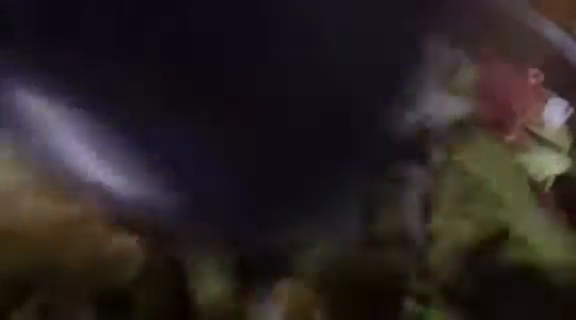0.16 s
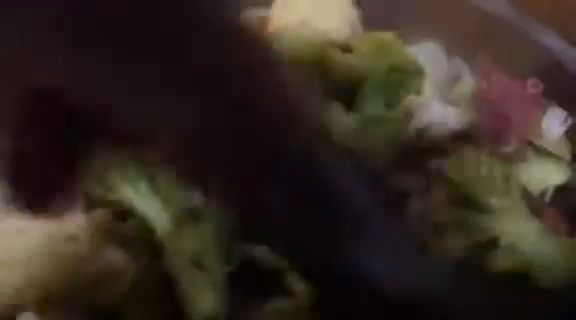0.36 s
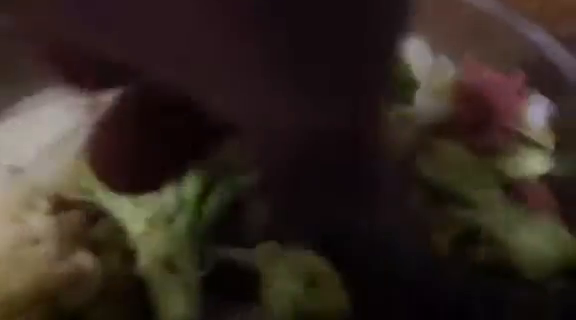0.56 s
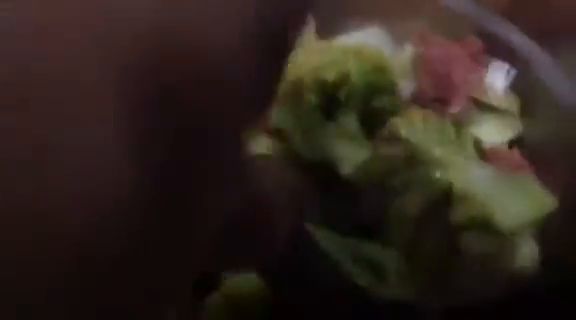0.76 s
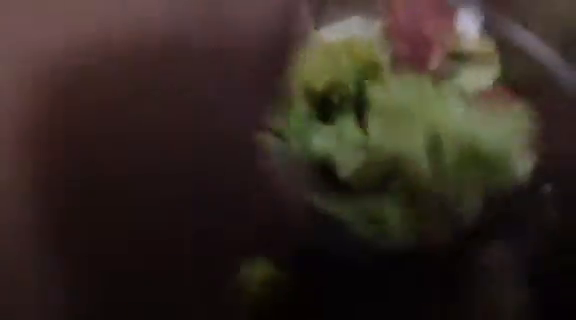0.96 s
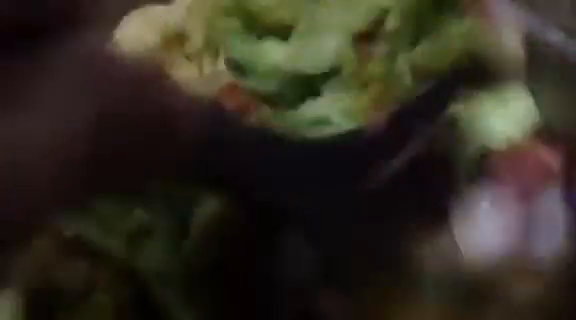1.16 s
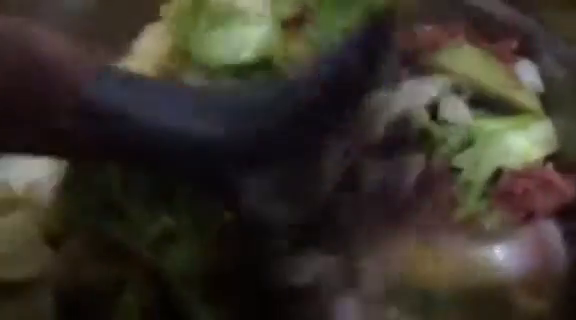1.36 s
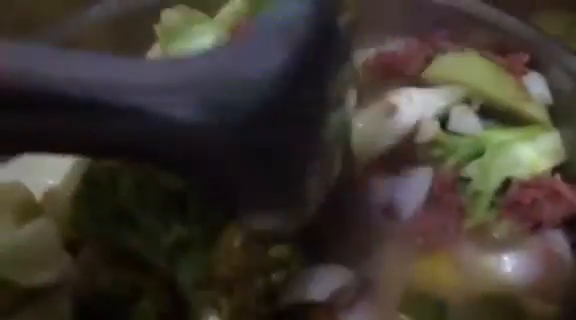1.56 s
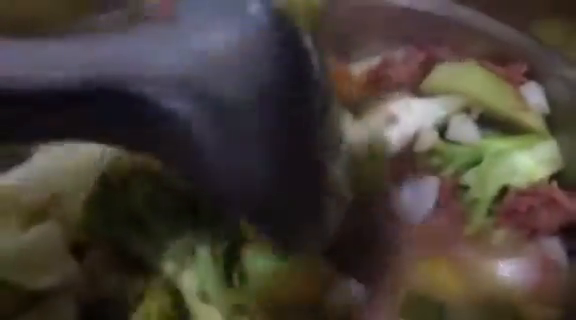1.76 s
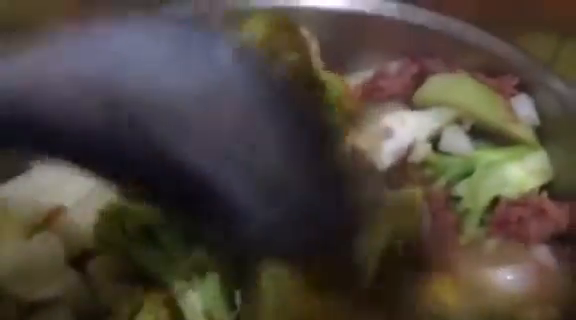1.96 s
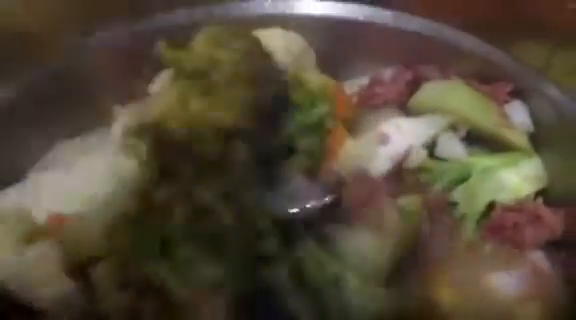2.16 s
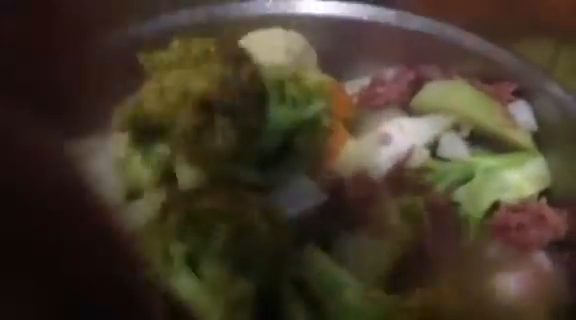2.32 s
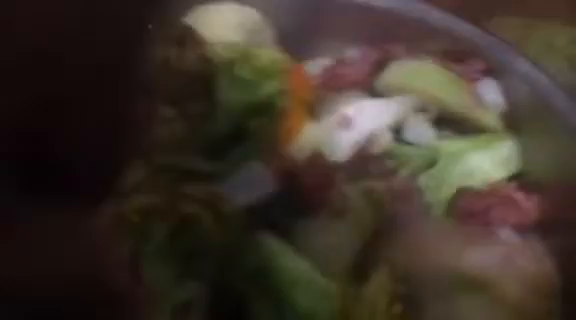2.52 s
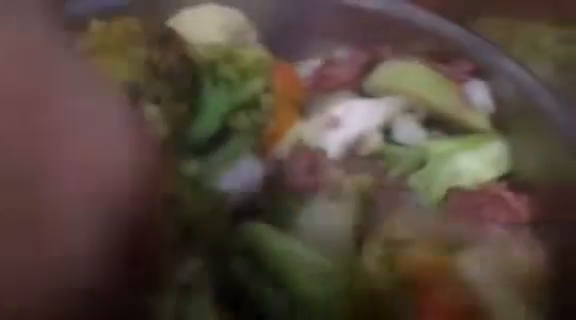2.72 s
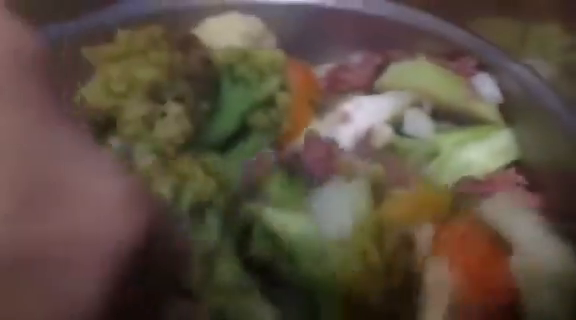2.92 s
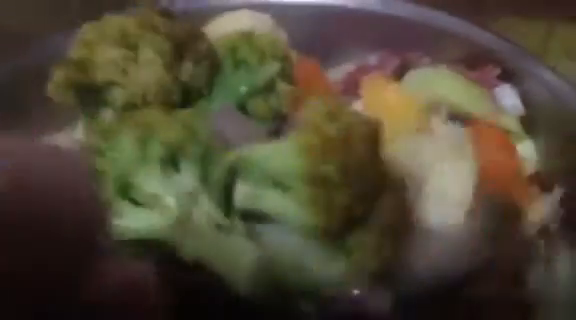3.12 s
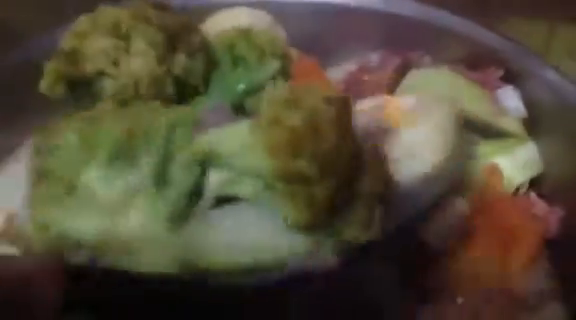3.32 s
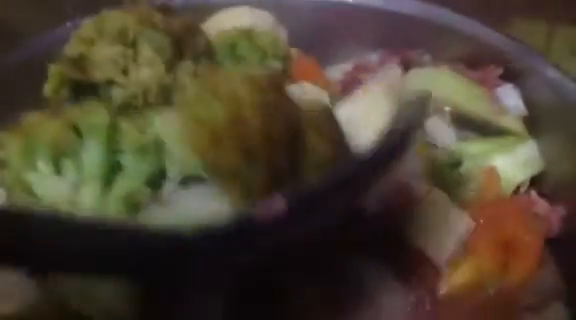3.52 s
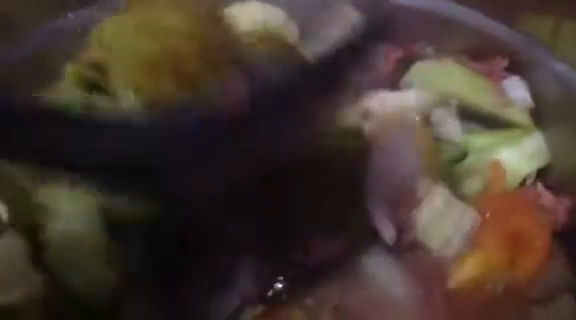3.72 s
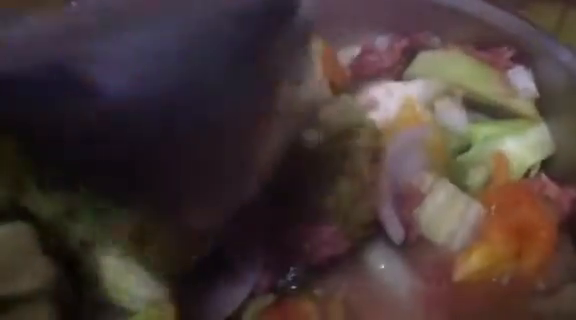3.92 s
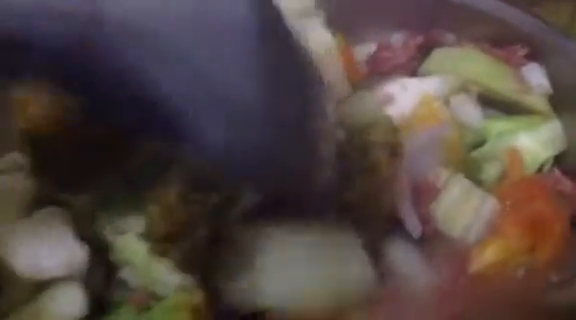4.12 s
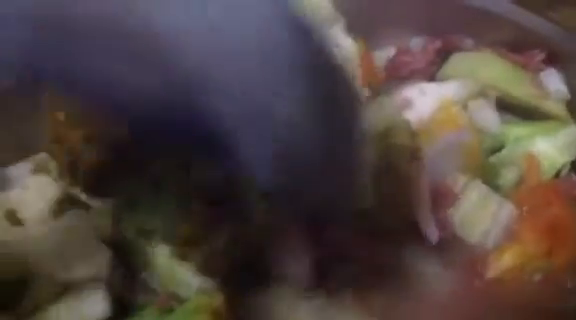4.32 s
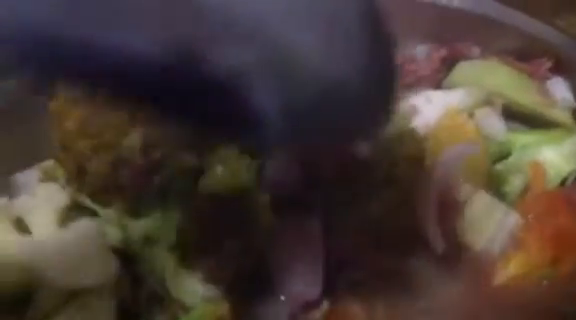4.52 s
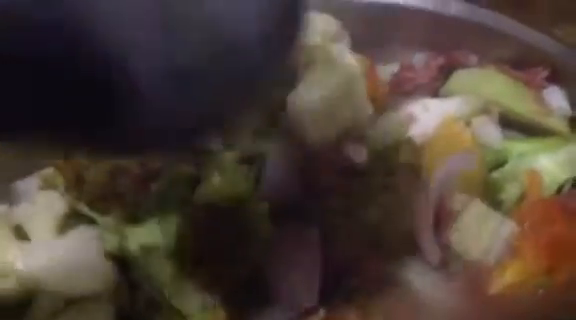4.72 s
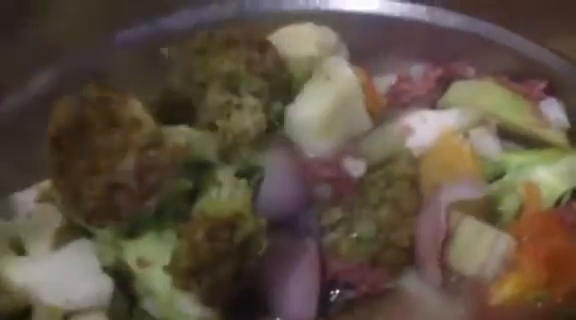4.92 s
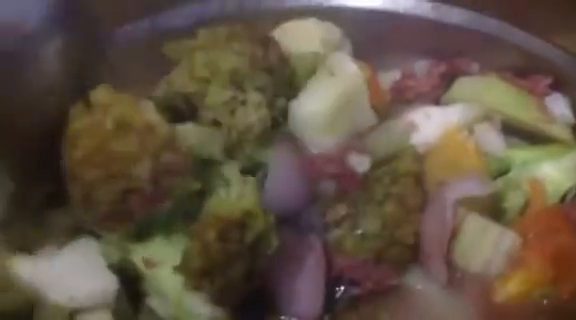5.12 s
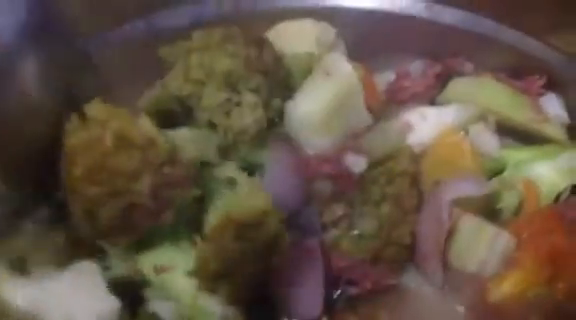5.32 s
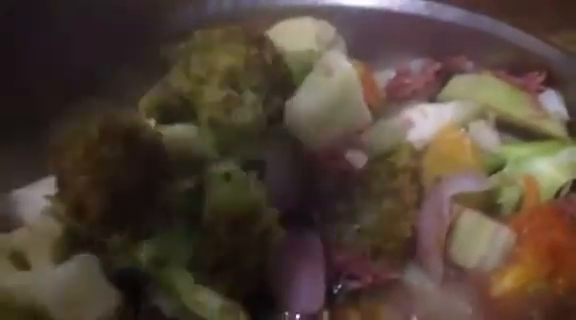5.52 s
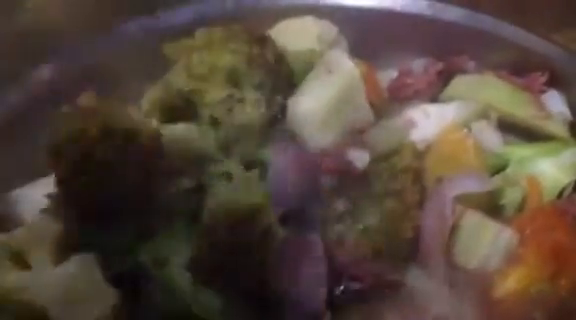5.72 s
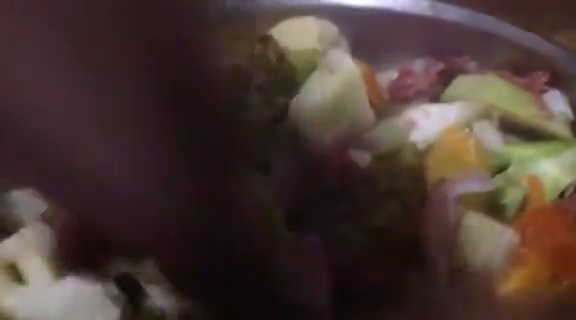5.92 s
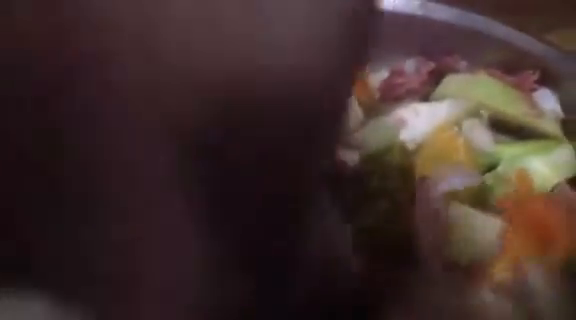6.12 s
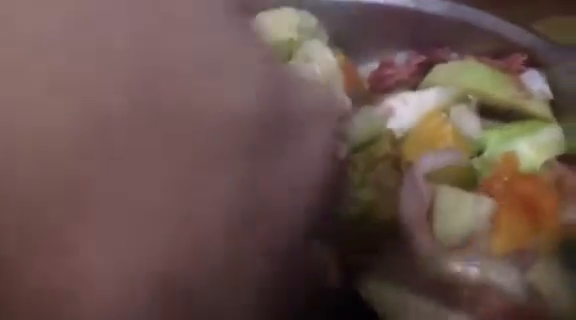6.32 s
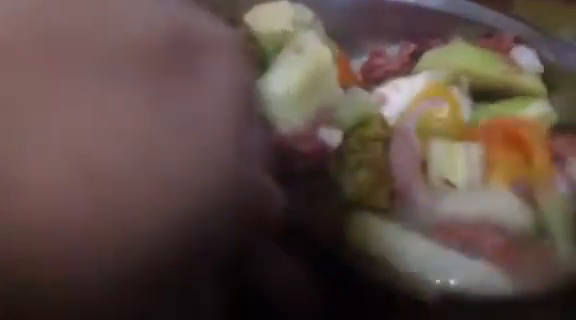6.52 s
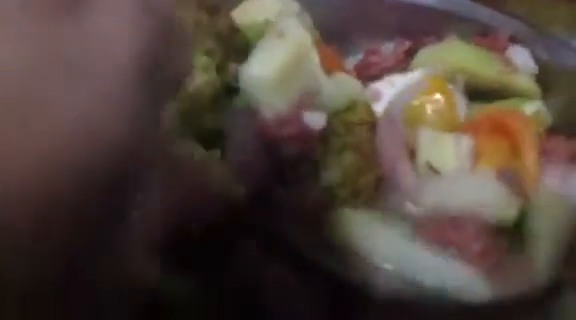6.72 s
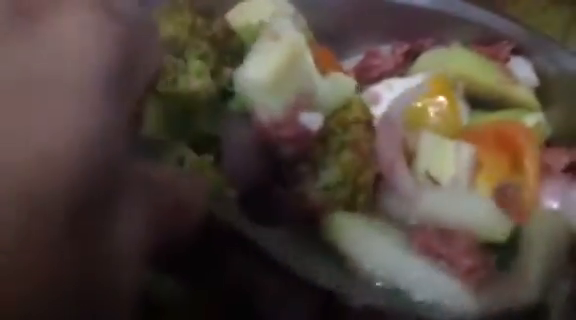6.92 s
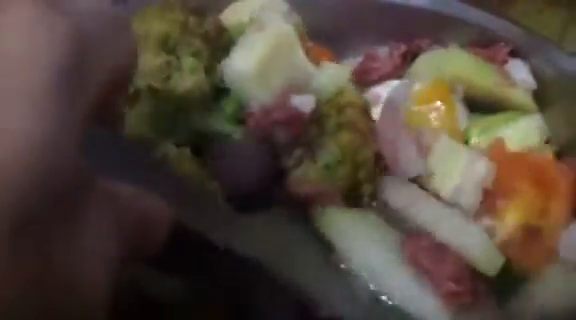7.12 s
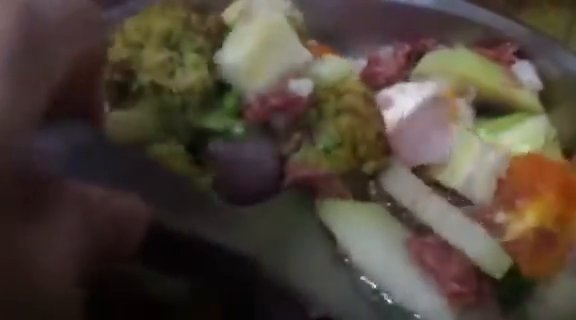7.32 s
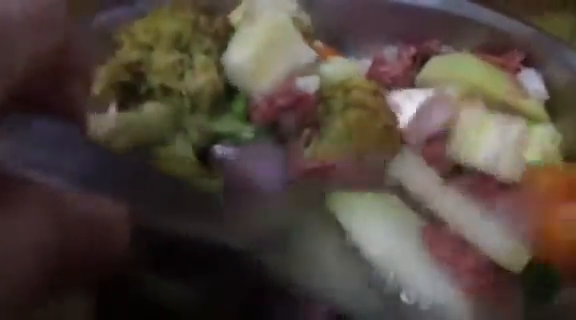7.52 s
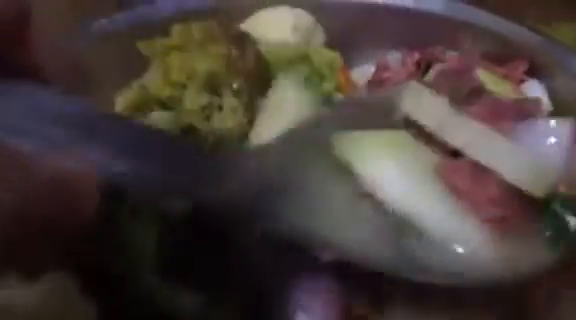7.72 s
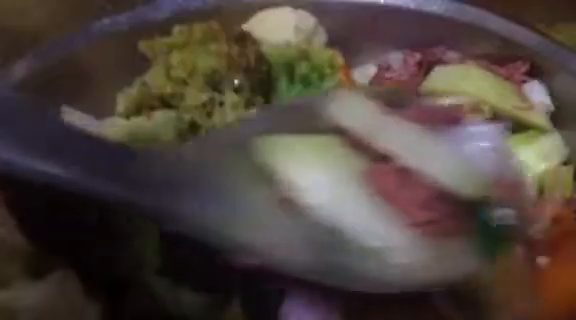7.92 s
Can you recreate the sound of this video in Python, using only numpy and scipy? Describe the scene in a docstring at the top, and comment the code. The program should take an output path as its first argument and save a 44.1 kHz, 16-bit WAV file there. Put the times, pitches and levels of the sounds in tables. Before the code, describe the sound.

Close up in a small kitchen, a spoon stirs juicy vegetables in a metal pan. Faint sizzle and a low steady room rush run throughout. A sharp ringing clink with a dull bump comes early, then wet squelches, soft rubbing and small smacks. A lighter knock follows, then the brightest clink on the rim late on, a strong wet snap, and more stirring with a faint low drag.

```python
"""Stirring wet vegetables in a metal pan

A spoon turns over wet vegetables in a metal pan, close by, in a small kitchen with a low steady rush.
Filtered noise and showers of short resonances make the simmer, squelch and rubbing; brief snaps make
the smacks, ticks and knocks. Cracks, dense clang and decaying modes make the spoon's clinks; gliding
sines make dull bumps, and noise through one resonance makes the drone of the dragging spoon."""
import sys
import numpy as np
from scipy import signal
from scipy.fft import rfft, irfft, next_fast_len
from scipy.io import wavfile

SR = 44100
rng = np.random.default_rng(int(sys.argv[2]) if len(sys.argv) > 2 else 0)


def wav_out(sig):
    """Save sig, one row per channel (or a flat mono array), as 16-bit PCM at SR to the path in sys.argv[1]."""
    wavfile.write(sys.argv[1], SR, np.round(np.clip(np.atleast_2d(sig).T, -1, 1) * 32767).astype(np.int16))


N = 355446
TIME = np.arange(N) / SR  # s
EDGE_HZ = 8020  # upper edge of the whole sound


def amp(db):
    """Decibel law: 20 dB is a factor of ten in amplitude."""
    return 10 ** (np.asarray(db) / 20)


def unit(x):
    """Normalisation: scales x to rms 1."""
    return x / np.sqrt(np.mean(x ** 2) + 1e-20)


def add(mix, s, sound):
    """Superposition: adds a sound to the mix from time s on."""
    part = mix[round(s * SR):][:len(sound)]
    part += sound[:len(part)]


def wander(t, per_s):
    """Random modulation: a smooth drift of rms about 1, read at the positions t."""
    steps = rng.standard_normal(1000) * np.sqrt(3 / 2)  # makes up for the smoothing between steps
    return np.interp(t * per_s + rng.random(), np.arange(len(steps)), steps)


def colour(x, points):
    """Spectral shaping: weights x by a curve of (f/Hz, level/dB) points, at rms 1."""
    hz, db = np.transpose(points)
    size = next_fast_len(len(x), True)
    f = np.fft.rfftfreq(size, 1 / SR)
    curve_db = np.interp(np.log(f + 1), np.log(hz), db)
    gain = amp(curve_db) * (f < EDGE_HZ + 400)
    return unit(irfft(rfft(x, size) * gain, size)[:len(x)])


def dense(count):
    """Random-phase superposition: equal partials at every frequency add up to noise."""
    return irfft(np.exp(2j * np.pi * rng.random(count // 2 + 1)), count)


def snap(t, hz, octaves):
    """Time-bandwidth reciprocity: the shorter this click, the wider its spectrum; its envelope peaks at 1."""
    u = t * hz * octaves * 2
    return u * np.exp(1 - u) * np.sin(2 * np.pi * hz * t)


def grains(count, spread_db, cycles, clump_db, channels=14):
    """Impulse excitation of resonators: tiny bursts of many pitches arrive in clumps."""
    out, shared = np.zeros(N), wander(TIME, per_s=51)
    for hz in np.geomspace(700, 7600, num=channels):
        at = np.sort(rng.integers(0, N, count // channels))
        # with a spread, most bursts are small and a few large
        size_db = spread_db * np.minimum(rng.exponential(1, len(at)), 4.5)
        clumps = wander(at / SR, per_s=28) + .5 * shared[at]
        strength = unit(amp(size_db + clump_db * clumps))
        kicks = np.bincount(at, strength * rng.choice([-1, 1], len(at)), N)
        r = np.exp(-hz / cycles / SR)  # each burst rings for a few cycles
        poles = [1, -2 * r * np.cos(2 * np.pi * hz / SR), r * r]
        out += hz * signal.lfilter([1, 0, -1], poles, kicks + 1e-12)
    return out


def kitchen(x, wet_db, t60):
    """Reverberation: close hard walls add a short tail of scattered, decaying echoes."""
    t = TIME[:SR // 2]
    scattered = rng.standard_normal(len(t)) * (rng.random(len(t)) < 3000 / SR)
    taps = scattered * amp(-60 * t / t60) * (t > .002)
    return x + amp(wet_db) * signal.oaconvolve(x, taps / np.linalg.norm(taps))[:N]


# spectrum of the room's rush: f/Hz, relative level/dB per Hz
RUSH_SPECTRUM = [(20, -53.5), (45, -31), (75, -6), (100, -12.5), (130, 2.5), (175, -1), (225, 0), (290, 4),
                 (390, -13.5), (560, -3), (850, -9.5), (1500, -12.5), (4000, -41)]


def rush(level_db=-56):
    """Stationary noise: the low steady rush of the stove and the room."""
    return amp(level_db) * colour(rng.standard_normal(N), RUSH_SPECTRUM)


# pushes of the spoon through the food: start t/s, length/s, wet crackle level/dB, dull rubbing level/dB
PUSHES = [(0, 0.84, -82, -56.5), (0.675, 0.46, -63, -57), (1.14, 0.26, -73, -58), (2.479, 0.11, -62, -50.5),
          (2.68, 0.38, -74, -60), (3.204, 0.51, -55.5, -63), (3.667, 0.21, -60, -60),
          (3.888, 0.81, -61, -64), (4.499, 0.65, -58, -60.5), (4.88, 0.8, -80, -58),
          (6.025, 0.086, -50, -77), (6.56, 1, -73, -58.5), (7.31, 0.41, -64.5, -59.5),
          (7.643, 0.69, -65, -59)]


def stirring(skew=0.5, fullness=0.58):
    """Shared excitation: each push (0-1) sets the gains of both wet crackle and dull rubbing."""
    push, wet, dull = np.zeros((3, N))
    for s, length, wet_db, dull_db in PUSHES:
        u = np.clip((TIME - s) / length, 0, 1)
        # a push swells quickly and eases off slowly
        arch = abs(np.sin(np.pi * u ** skew)) ** fullness
        push = np.maximum(push, arch)
        # powers add where pushes overlap
        wet = np.hypot(wet, amp(wet_db) * arch)
        dull = np.hypot(dull, amp(dull_db) * arch)
    return push, wet, dull


# sizzle of the hot pan, rising and falling: t/s, level/dB
SIZZLE_LEVEL = [(0, -62.5), (.65, -59.5), (1.12, -62.5), (1.35, -57.5), (2.2, -59.5), (2.65, -56),
                (3.1, -58), (4.3, -59.5), (5.6, -57.5), (6.27, -58.5), (6.38, -65), (7.0, -62), (7.27, -68),
                (7.4, -60), (7.62, -63), (7.76, -56.5), (8.06, -59)]


def simmering():
    """Amplitude envelope: the gain of the simmering juices, interpolated in dB."""
    s, level_db = np.transpose(SIZZLE_LEVEL)
    return amp(np.interp(TIME, s, level_db))


# spectrum of the wet crackle: f/Hz, relative level/dB per Hz
SQUELCH_SPECTRUM = [(900, -47.5), (1600, 4.5), (2300, 5.5), (2850, 10), (3600, 4), (4800, 0), (7400, -6.5),
                    (8000, -29)]


def squelch(wet, heat, simmer_db=0.0):
    """Granular noise: wet pieces crackle under the spoon in many brief bursts."""
    crackle = np.hypot(wet, amp(simmer_db) * heat)  # the juices simmer on between pushes
    bursts = grains(count=22000, spread_db=0.0, cycles=2.2, clump_db=2.5)
    return crackle * colour(bursts, SQUELCH_SPECTRUM)


# spectrum of the sizzle: f/Hz, relative level/dB per Hz
SIZZLE_SPECTRUM = [(800, -8.5), (2000, -5.5), (4200, 4), (5500, 2.5), (6700, 3.5), (7450, 2), (7950, -17)]


def sizzle(heat, spit_db=-9, flare_db=0.5):
    """Shot noise: tiny bubbles burst and spit at random on the hot metal."""
    bubbles = unit(grains(count=150000, spread_db=2.0, cycles=1.3, clump_db=3.5))
    spits = unit(rng.standard_normal(N) * (rng.random(N) < 50 / SR))  # about 50 per s
    flare = amp(flare_db * wander(TIME, per_s=14))  # juice reaches the hot metal unevenly
    return heat * flare * colour(bubbles + amp(spit_db) * spits, SIZZLE_SPECTRUM)


# spectrum of the rubbing: f/Hz, relative level/dB per Hz
RUB_SPECTRUM = [(200, -11.5), (330, 6), (600, 6.5), (900, -2), (1200, 3.5), (1500, -7), (2500, -3.5),
                (8000, -28)]


def rub(dull, rest_db=-61, clump_db=2.5):
    """Friction noise: pieces rub under the spoon with an unsteady dull rustle."""
    rubbing = np.hypot(dull, amp(rest_db))
    unsteady = amp(clump_db * wander(TIME, per_s=60))
    return rubbing * unsteady * colour(rng.standard_normal(N), RUB_SPECTRUM)


def smack(db, hz, octaves, t60, spatter_db, spatter_rise=0.0007):
    """Impulsive excitation: a snap of a few cycles, with a short noisy spatter decaying after it."""
    t = TIME[:SR // 7]
    f = np.geomspace(100, 9000, num=30)
    band_db = -10 * np.log10(1 + (np.log2(f / hz) / octaves) ** 4)
    fade = amp(-60 * t / t60) * np.minimum(t / spatter_rise, 1)
    spatter = colour(dense(len(t)), np.column_stack([f, band_db])) * fade
    return amp(db) * (snap(t, hz, octaves) + amp(spatter_db) * spatter)


# small smacks, by chance during pushes
SMALL_PER_S = 21  # at full push
SMALL_OVER_DB, SMALL_SCATTER_DB = 13.5, 2.5  # mean snap level over the wet crackle gain, and its scatter
SMALL_HZ, SMALL_SCATTER_OCTAVES = 2520, 0.48  # middle pitch and its scatter
SMALL_OCTAVES, SMALL_T60, SMALL_SPATTER_DB = 0.37, 0.015, -21  # spread, spatter decay in s and level
# the loudest short smacks, ticks, knocks and scrapes: t/s, snap peak level/dB, centre f/Hz,
# spread/octaves, spatter t60/s, spatter level/dB against the snap
LOUD_SMACKS = [(0.091, -43, 3150, 0.17, 0.05, 2.5), (0.5624, -35, 1690, 0.13, .04, -19),
               (0.6235, -41.5, 1090, 1.2, 0.034, -3), (0.721, -41.5, 2420, 0.44, .02, -18),
               (0.772, -42, 4670, 0.5, .02, -4), (0.831, -44.5, 2750, 0.48, 0.067, -1.5),
               (1.169, -44.5, 2340, 0.24, .03, -4), (1.177, -40, 900, 0.37, 0.11, -4.5),
               (1.281, -35, 2900, 1.1, .015, -24), (1.3095, -35, 3800, .8, .012, -16),
               (1.3408, -32.5, 3870, 0.97, 0.018, -7), (1.354, -44.5, 1090, 0.42, 0.083, -4.5),
               (1.373, -42.5, 2900, 0.16, .02, -16), (1.4658, -37.5, 3480, 0.31, 0.036, -7),
               (1.4825, -46, 3390, .21, .02, -22), (1.5555, -34.5, 4150, 0.55, 0.022, -10),
               (1.7836, -40, 2730, .55, 0.064, -7), (1.8026, -43.5, 2700, 0.97, 0.063, -2),
               (2.3782, -35, 1700, 0.73, 0.04, -7), (2.394, -44, 1890, .35, .03, -11),
               (2.402, -46, 3370, 0.27, .02, -17), (2.4624, -42, 2730, 0.22, 0.082, -4),
               (2.505, -46, 4000, 0.5, .2, -4), (2.521, -46.5, 4000, 0.48, 0.1, -1.5),
               (2.7396, -39, 2840, 0.75, 0.022, -6), (3.0125, -45, 1900, 1.4, .02, -4),
               (3.036, -43.5, 1240, 0.44, 0.095, -6.5), (3.163, -43, 5000, 1.1, 0.018, -1),
               (3.1701, -32, 2320, 1.3, 0.045, -8.5), (3.192, -32, 2170, 0.6, 0.048, -13),
               (3.2263, -39.5, 4160, 0.79, 0.022, -5), (3.2817, -40, 2800, 0.23, .02, -16),
               (3.306, -42, 2960, .3, .015, -18), (3.322, -39, 3120, 0.5, 0.05, -7),
               (3.355, -44, 2870, .57, .015, -20), (3.3931, -38, 2800, 0.59, .015, -18),
               (3.413, -42, 2330, 0.45, 0.087, -6), (3.4863, -37.5, 2510, 0.32, .02, -21),
               (3.5685, -36, 2300, 0.55, .014, -8), (3.667, -39, 3370, 0.3, .02, -20),
               (3.7326, -43, 2860, 0.23, .015, -18), (3.749, -42.5, 1800, 0.94, .03, -1.5),
               (4.026, -37, 3560, .6, .015, -18), (4.5247, -34, 2740, 0.42, .015, -18),
               (4.5334, -41, 3200, 0.22, .015, -20), (4.5681, -44, 2880, 0.49, .015, -18),
               (4.577, -37.5, 1790, 1.0, .02, -6), (4.6095, -39, 3250, .4, .015, -20),
               (4.695, -40, 2900, 0.34, .02, -18), (4.704, -42, 2770, 0.25, .02, -18),
               (4.8166, -40, 2900, 0.38, .015, -16), (4.839, -32, 2740, 0.32, 0.054, -16),
               (4.9024, -42, 2670, .3, .015, -18), (4.925, -37, 4130, 0.62, .02, -7),
               (4.975, -38, 3120, 0.71, 0.022, -6), (5.3474, -40, 3080, 0.79, .015, -14),
               (5.451, -42, 2820, 0.35, .015, -18), (5.7299, -45, 3920, 0.61, .015, -18),
               (6.0476, -23.5, 2520, 0.4, 0.022, -4.5), (6.061, -38, 3580, .35, 0.091, -11),
               (6.232, -40.5, 2490, 0.25, 0.18, -11), (6.256, -42.5, 2980, 1, 0.051, -4),
               (6.32, -41, 5800, 0.28, .03, -10), (6.9379, -45, 1670, 0.77, .03, -8),
               (6.978, -36.5, 2600, 0.47, .02, -19), (7.1498, -37, 5700, 1.2, .012, -5.5),
               (7.163, -34.5, 2670, 0.95, 0.021, -7.5), (7.344, -41, 2400, 0.31, .03, -11),
               (7.4044, -43, 2900, 0.26, .015, -16), (7.465, -41, 2660, 0.32, 0.047, -7),
               (7.551, -36, 3100, 0.32, .02, -3), (7.56, -31, 2600, 0.51, 0.013, -19),
               (7.6566, -38, 2600, 0.52, .02, -18), (7.6877, -44, 4130, 0.63, .02, -4),
               (7.740, -38, 3700, 0.72, 0.022, -10), (7.8003, -38, 3200, 0.56, .02, -15)]


def smacks(push, wet, count=300):
    """Random point process: small smacks join the loud ones, thicker and stronger with the push."""
    out = np.zeros(N)
    for s, *sound in LOUD_SMACKS:
        add(out, s, smack(*sound))
    for at in rng.integers(0, N, count):
        if rng.random() < push[at] * SMALL_PER_S * TIME[-1] / count:
            size, pitch = rng.standard_normal(2)
            db = SMALL_OVER_DB + SMALL_SCATTER_DB * size
            hz = SMALL_HZ * 2 ** (SMALL_SCATTER_OCTAVES * pitch)
            small = smack(db, hz, SMALL_OCTAVES, SMALL_T60, SMALL_SPATTER_DB)
            add(out, TIME[at], wet[at] * small)
    return kitchen(out, wet_db=-6, t60=0.11)


# bands where the pan has hardly any modes: f/Hz, half width/Hz
MODE_GAPS = [(1540, 50), (2250, 85), (3025, 45)]


def mode_clusters(f, gap_db=-16):
    """Modal density: each blow wakes some clusters of modes and misses others."""
    gaps = amp(gap_db * sum(np.exp(-((f - hz) / width) ** 4) for hz, width in MODE_GAPS))
    return gaps * amp(2.5 * wander(f, per_s=1 / 70))  # here the drift runs along frequency


def crack(t, f, spectrum, clusters, ring, chatter_db, t60=0.059, tilt_db=3.0, level_db=-2, chatter_s=0.012):
    """Impact noise: a quickly damped crack, strongest while the spoon's edge chatters on the metal."""
    brighter = [(hz, level + tilt_db * np.log2(hz)) for hz, level in spectrum]
    chatter = chatter_db * np.exp(-(t / chatter_s) ** 4)
    fade = amp(level_db - 60 * t / (t60 * ring) + chatter)
    noise = colour(irfft(rfft(dense(len(t))) * clusters), brighter) * fade
    return noise * np.linalg.norm(fade) / np.linalg.norm(noise)


def clang(t, f, spectrum, clusters, ring, level_db=-14, t60=0.25):
    """Diffuse modal field: a crowd of weak separate partials, about one in every 30 Hz, dies away."""
    crowd = np.diff(np.floor(f / 30 + .6 * wander(f, per_s=1 / 30)), prepend=0) > 0
    partials = irfft(crowd * clusters * np.exp(2j * np.pi * rng.random(len(f))))
    return colour(partials, spectrum) * amp(level_db - 60 * t / (t60 * ring))


# the pan's clear modes: f/Hz, t60/s at ring factor 1, relative level/dB struck on rim, on wall, on floor
PAN_MODES = [(147, .25, -24, -14, -14), (203, .28, -17, -8, -8), (330, .2, -24, -10, -14),
             (384, .18, -22, -7, -4), (457, .22, -24, -16, -7), (502, .22, -25, -18, -4),
             (571, .33, -19, -26, -14), (606, .22, -22, -18, -6), (671, .14, -16, -9, -12),
             (1044, .16, -14, -9, -10), (1114, .16, -13, -2, -2), (1157, .7, -28, -26, -13),
             (1283, .3, -15, -22, -10), (1916, .2, -7, -18, -20), (1937, .21, -6, -7, -18),
             (2402, .2, -12, -16, -10), (2460, .2, -9, -16, -16), (2580, .19, -13, -16, -18),
             (2750, .21, -9, -15, -16), (2943, .16, -22, -14, -8), (1190, .9, -31, -25, -13),
             (1236, .3, -8, -22, -15), (1694, .19, -4, -18, -14), (1782, .2, 1, -24, -18),
             (1850, .22, -4, -20, -22), (1962, .24, -1, -5, -15), (2004, .25, -3, -13, -24),
             (2054, .2, -13, -10, -18), (2347, .2, -13, -35, -24), (2531, .22, -2, -25, -14),
             (2628, .2, -8, -9, -20), (2676, .2, -7, -7, -13), (2700, .15, -14, -7, -16),
             (2787, .17, -11, -12, -14), (2839, .13, -3, -14, -12), (2916, .11, -20, -7, -10),
             (3087, .16, -25, -8, -20), (3127, .22, -8, -13, -20), (3287, .2, -20, -6, -20),
             (3387, .24, -22, -11, -20), (3468, .28, -15, -10, -22), (3527, .33, -10, -9, -24),
             (3614, .34, -2, -12, -30), (3704, .25, -9, -28, -30), (3812, .22, -9, -18, -22),
             (4031, .26, -15, -21, -28), (4127, .22, -12, -19, -22), (4210, .19, -10, -22, -14),
             (4538, .16, -17, -9, -18), (4790, .18, -16, -12, -26), (4936, .2, -8, -16, -24),
             (4980, .23, -5, -10, -26), (5437, .18, -17, -13, -28), (5770, .2, -12, -26, -20),
             (6525, .18, -8, -16, -24), (6655, .2, -14, -20, -22), (6701, .24, -12, -23, -20),
             (6826, .2, -15, -18, -22), (6982, .2, -12, -11, -15), (7558, .15, -18, -30, -28)]


def pan_modes(t, spot, ring, level_db=-12, ring_up_cycles=2.5, beat=0.41):
    """Modal superposition: decaying sines, weighted by the spot struck, ring on together."""
    out = np.zeros(len(t))
    for hz, t60, *levels in PAN_MODES:
        # echoes from close walls make each mode flutter and waver as it dies
        flutter = 1 + beat * wander(t, per_s=148)
        phase = 2 * np.pi * (hz * t + rng.random()) + .5 * wander(t, per_s=70)
        build = 1 - np.exp(-t * hz / ring_up_cycles)  # low modes are slow to build up
        fade = amp(level_db + levels[spot] - 60 * t / (t60 * ring))
        out += fade * build * flutter * np.sin(phase)
    return out


# column of levels for each spot struck
SPOT_COLUMN = {"rim": 0, "wall": 1, "floor": 2}
# the dense, quickly damped modes of pan and spoon: f/Hz, relative level/dB on rim, on wall, on floor
CLANG_SPECTRA = [(90, -19, -38, -23), (220, -19, -13, -24), (480, -22, -16.5, 9), (820, -8.5, -18.5, -26),
                 (1162, -25, 6, 2), (1400, -10.5, -23, -10), (1920, 2.5, 2, -12), (2350, -8, -12, -11),
                 (2660, -10.5, 2.5, -8.5), (3110, -28, -14.5, -17), (3780, -8, -8, -12),
                 (4270, -12.5, -13, -11), (4800, -7, -10, -21.5), (6080, -11, -16, -21),
                 (6800, -8, -4.5, -18), (8000, -15, -9, -25), (7360, -15, -22.5, -24)]
# spoon on pan: t/s, level/dB, spot struck, ring time factor (food damps it),
# chatter level/dB over the crack, contact tink peak level/dB, tink f/Hz, tink spread/octaves
SPOON_CLINKS = [(0.4557, -16.5, "wall", 0.98, 3.5, -12, 5800, 0.59),
                (0.5525, -33.5, "wall", 1.13, -5, -34, 5860, 0.078),
                (2.5418, -44, "wall", .3, 1, -38, 5000, .3),
                (2.5526, -23.5, "floor", 0.56, 2.5, -22, 2810, 0.23),
                (2.563, -30, "floor", 0.98, 1, -36, 4200, .2),
                (5.7723, -13, "rim", 1.075, 4.5, -12, 1864, 0.13),
                (5.7865, -35, "wall", 0.69, 7, -29, 2590, 0.074),
                (5.8185, -33.5, "wall", 0.92, 9.5, -34, 1980, .1),
                (6.025, -36.5, "floor", 0.74, 1.5, -40, 3600, .8)]


def clinks(rise=0.00068):
    """Impact excitation: each blow is a contact tink, a chattering crack, a clang and ringing modes."""
    out, t = np.zeros(N), TIME[:16384]
    f = np.fft.rfftfreq(len(t), 1 / SR)
    for s, db, spot_name, ring, chatter_db, tink_db, tink_hz, tink_octaves in SPOON_CLINKS:
        spot = SPOT_COLUMN[spot_name]
        spectrum = [(hz, levels[spot]) for hz, *levels in CLANG_SPECTRA]
        clusters = mode_clusters(f)
        blow = crack(t, f, spectrum, clusters, ring, chatter_db)
        blow += clang(t, f, spectrum, clusters, ring)
        blow += pan_modes(t, spot, ring)
        add(out, s, amp(db) * blow * np.minimum(t / rise, 1))
        add(out, s + rise, amp(tink_db) * snap(t, tink_hz, tink_octaves))
    # thin metal radiates no deep bass
    out = signal.sosfilt(signal.butter(2, 140, "high", fs=SR, output="sos"), out)
    return kitchen(out, wet_db=-13, t60=0.2)


# dull bumps of heavy pieces and the spoon's bowl: t/s, envelope peak level/dB before the high-pass,
# f/Hz in the middle of the glide, swell time/s
DULL_BUMPS = [(0.5608, -20, 380, 0.00077), (.565, -36, 516, 0.00059), (0.5718, -30, 193, 0.0032),
              (.613, -39.5, 340, 0.0053), (0.6234, -29.5, 400, 0.001), (0.6257, -29, 179, 0.0028),
              (0.674, -51, 256, 0.012), (1.3548, -41, 313, 0.0022), (2.5105, -32, 208, 0.0032),
              (2.520, -34.5, 204, 0.0039), (5.773, -19, 680, 0.0012)]


def bumps(sag=0.33, lowest_hz=100):
    """Damped oscillation: a soft push swells and dies, its pitch sagging as the piece settles."""
    out, t = np.zeros(N), TIME[:SR // 8]
    for s, db, hz, swell in DULL_BUMPS:
        u = t / swell
        turns = np.cumsum(hz * (1 + sag * (2 * np.exp(-u / 2) - 1))) / SR
        add(out, s, amp(db) * u * np.exp(1 - u) * np.sin(2 * np.pi * turns))
    # small things radiate no deep bass
    out = signal.sosfilt(signal.butter(2, lowest_hz, "high", fs=SR, output="sos"), out)
    return kitchen(out, wet_db=-12, t60=0.23)


# the spoon's bowl drags along the pan floor: t/s, level/dB
DRAG_LEVEL = [(6.0, -87), (6.3, -60), (6.6, -69), (7.0, -53.5), (7.3, -60), (7.7, -60.5), (8.0, -77)]


def drag(hz=293, width_hz=28):
    """Resonance: friction noise under the spoon's bowl feeds one low mode, heard as a drone."""
    drone = signal.lfilter(*signal.iirpeak(hz, hz / width_hz, fs=SR), rng.standard_normal(N))
    return amp(np.interp(TIME, *np.transpose(DRAG_LEVEL))) * unit(drone)


def scene():
    """Superposition: the pushes stir the food; knocks, drag and room sound along."""
    push, wet, dull = stirring()
    heat = simmering()
    food = squelch(wet, heat) + sizzle(heat) + rub(dull)
    return (rush() + food + smacks(push, wet) + clinks() + bumps() + drag())[None]


def record(dry):
    """Low-pass filtering: only the band below the upper edge is kept."""
    lowpass = signal.firwin(301, EDGE_HZ, window=("kaiser", 8), fs=SR)
    return signal.oaconvolve(dry, lowpass[None], "same")


dry = scene()
out = record(dry)
wav_out(out)
```